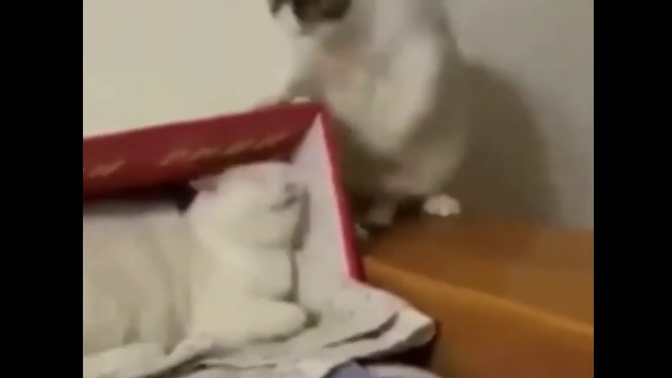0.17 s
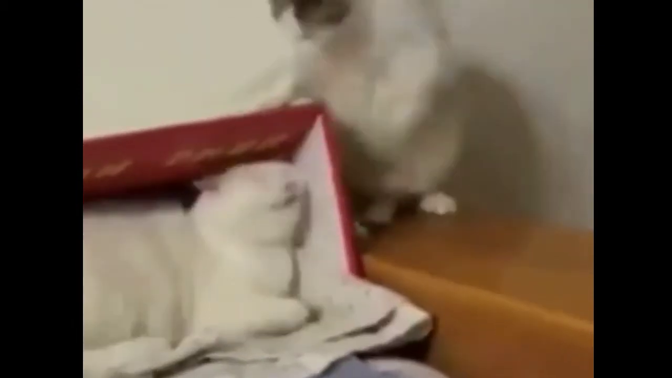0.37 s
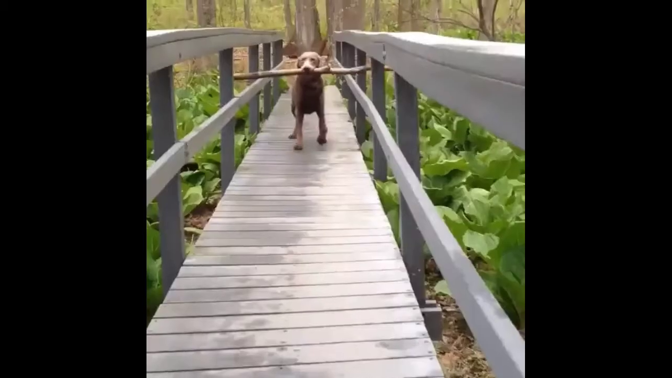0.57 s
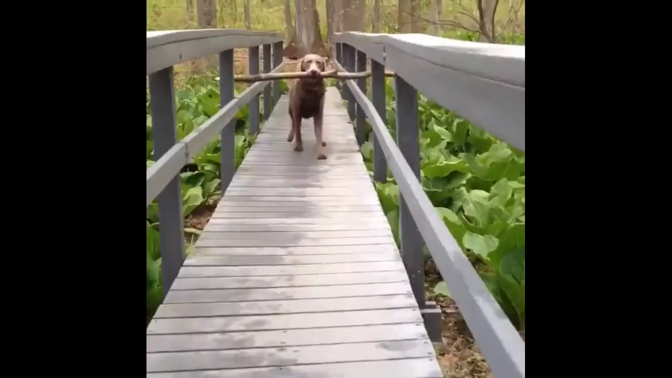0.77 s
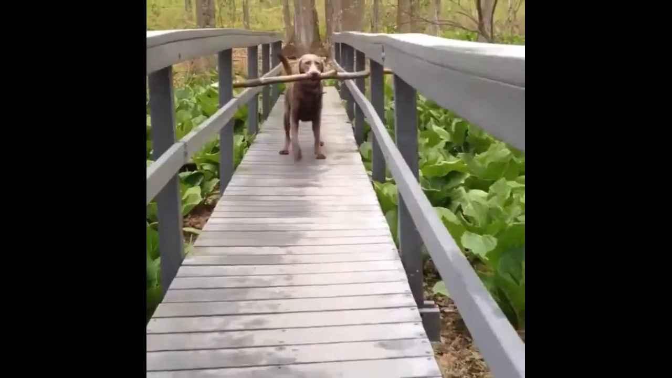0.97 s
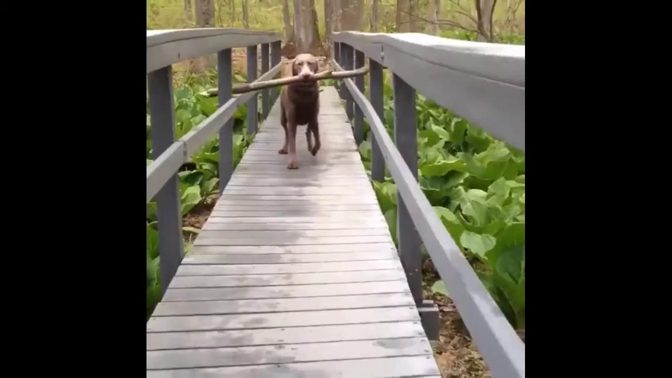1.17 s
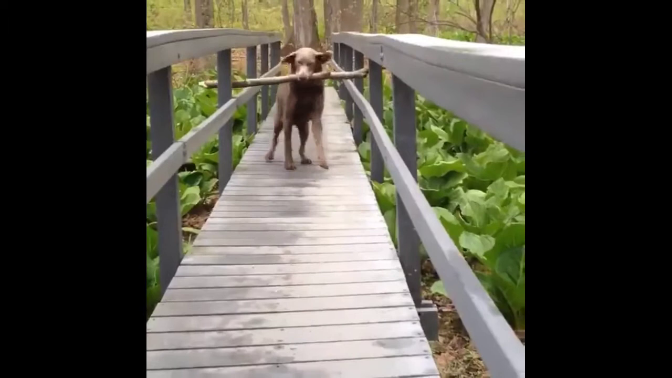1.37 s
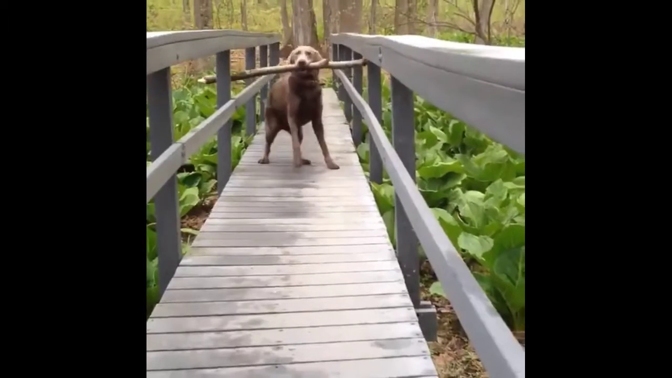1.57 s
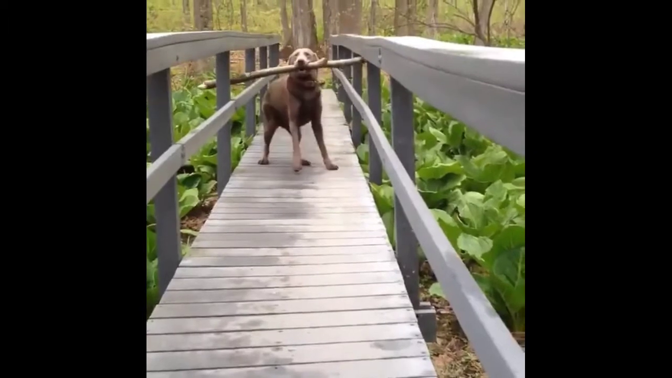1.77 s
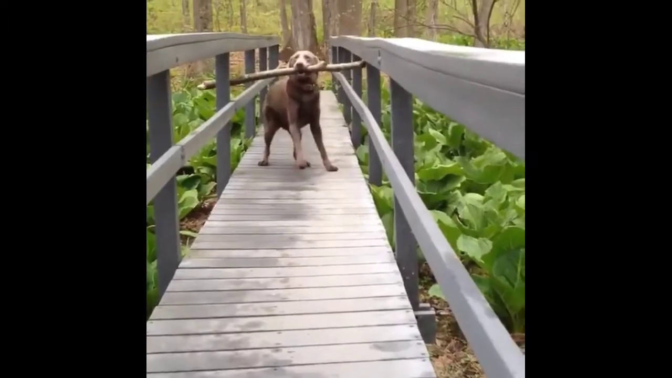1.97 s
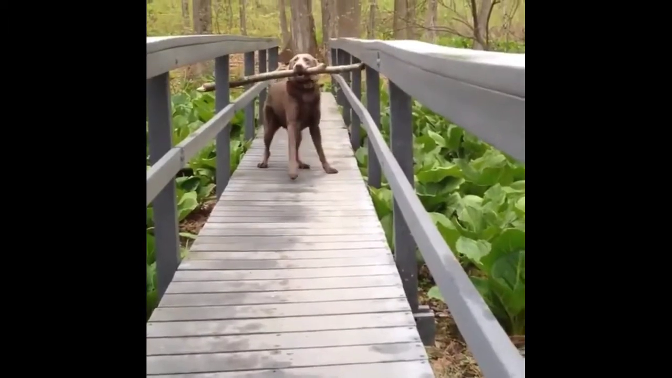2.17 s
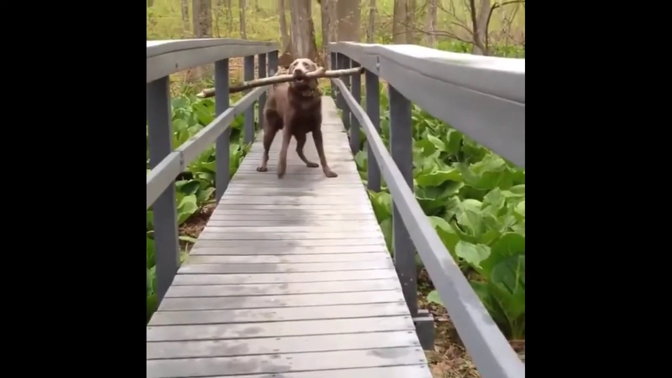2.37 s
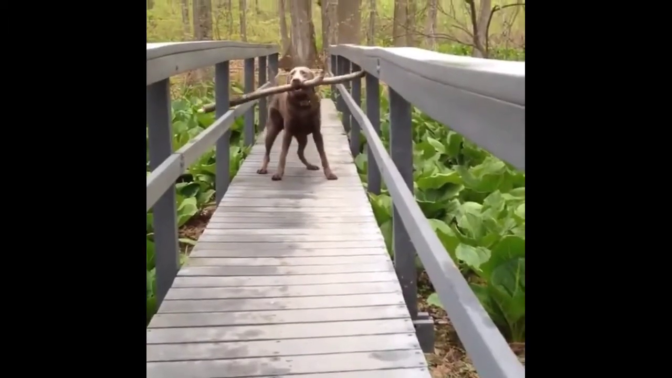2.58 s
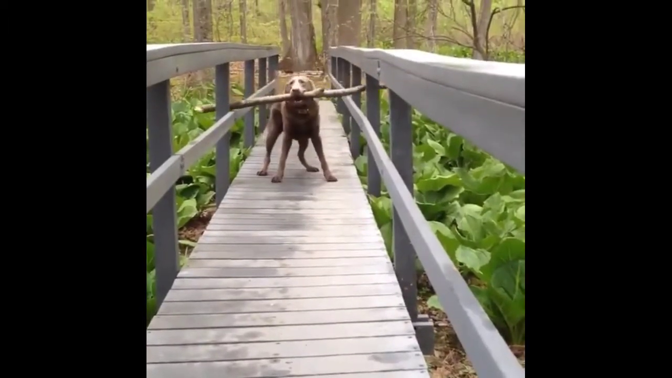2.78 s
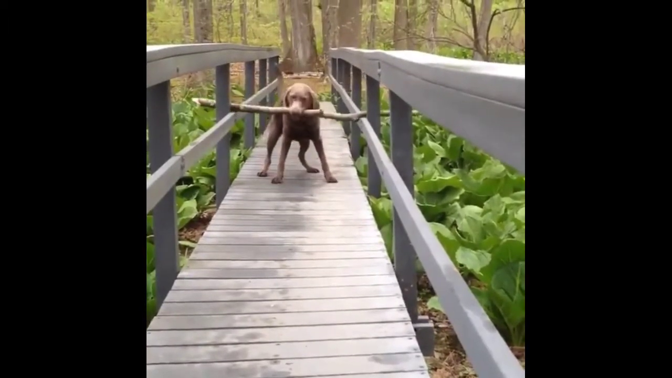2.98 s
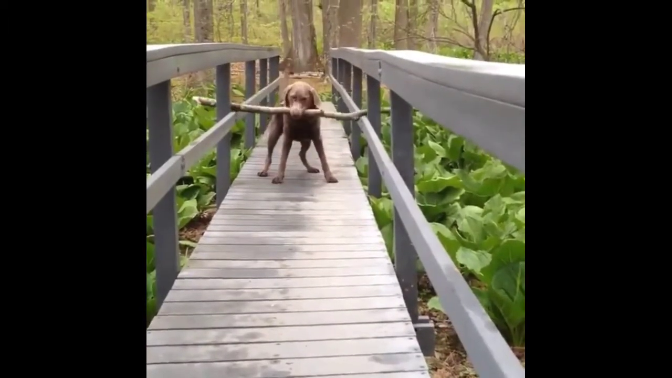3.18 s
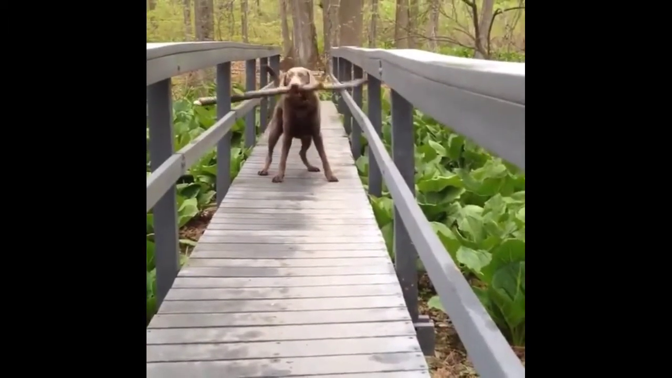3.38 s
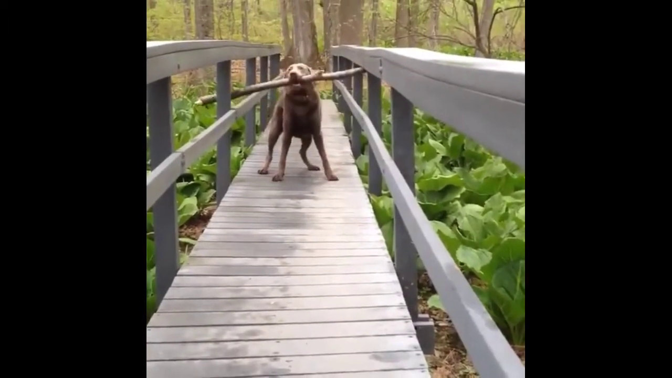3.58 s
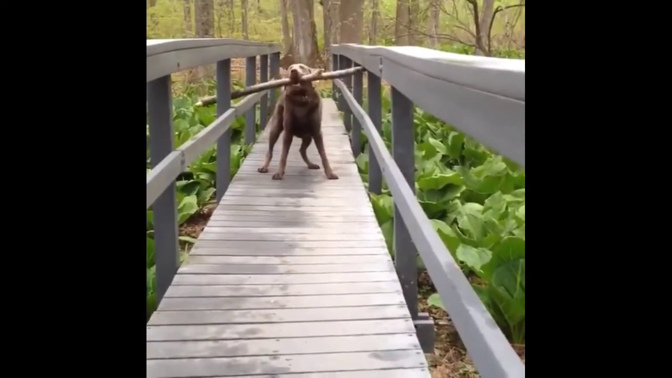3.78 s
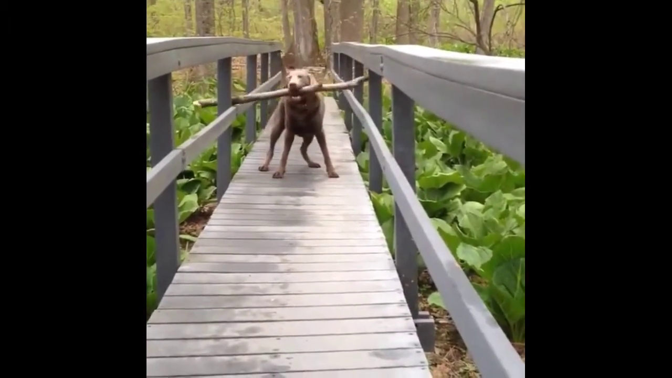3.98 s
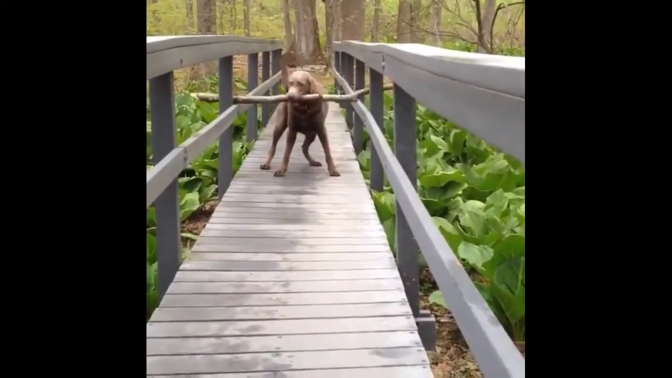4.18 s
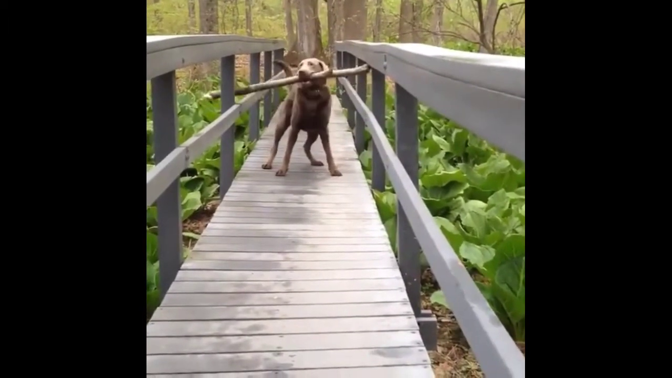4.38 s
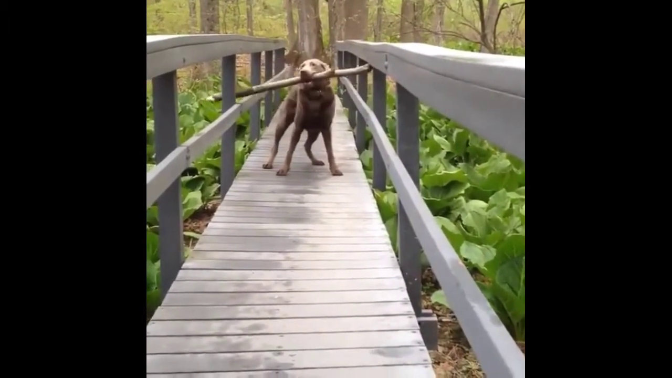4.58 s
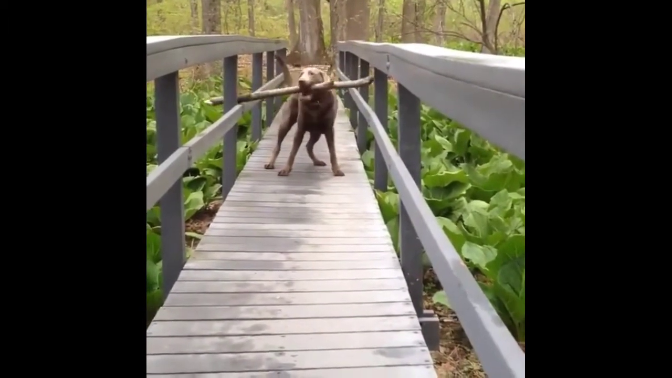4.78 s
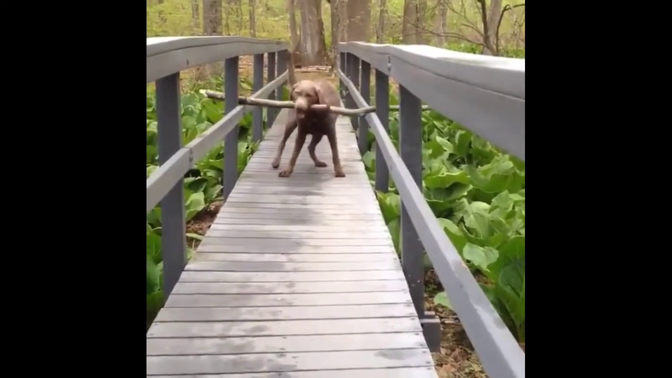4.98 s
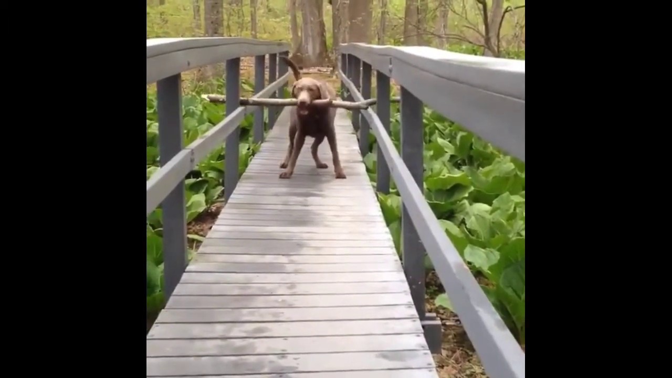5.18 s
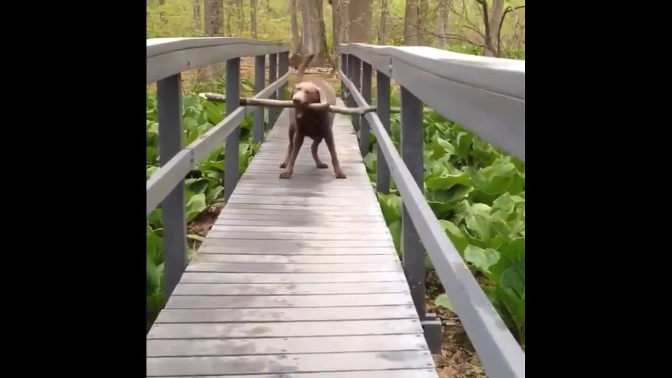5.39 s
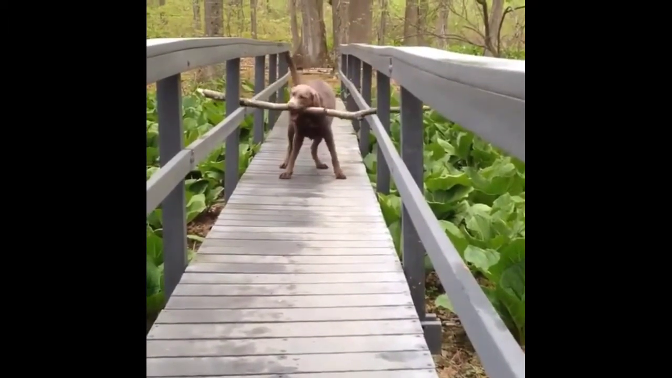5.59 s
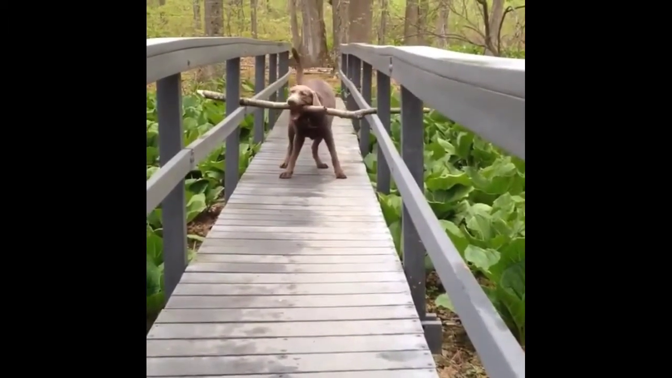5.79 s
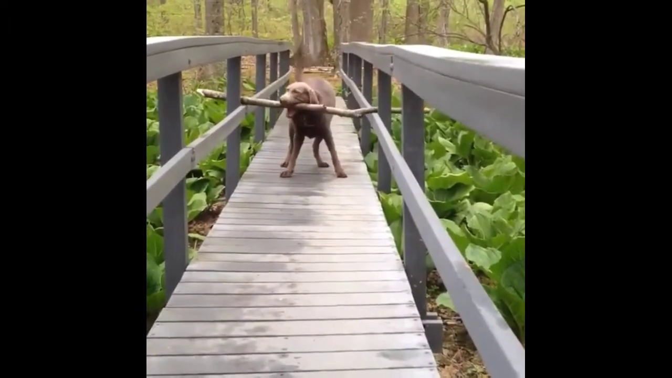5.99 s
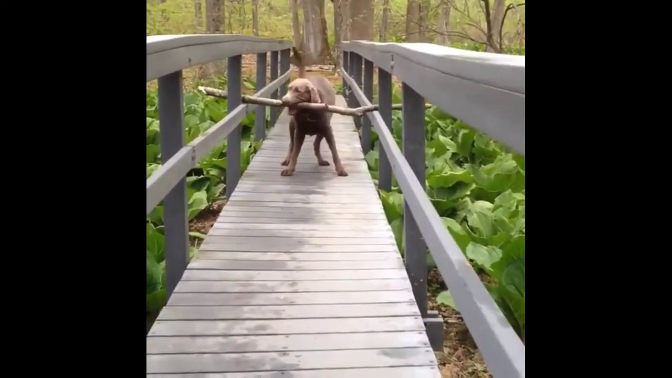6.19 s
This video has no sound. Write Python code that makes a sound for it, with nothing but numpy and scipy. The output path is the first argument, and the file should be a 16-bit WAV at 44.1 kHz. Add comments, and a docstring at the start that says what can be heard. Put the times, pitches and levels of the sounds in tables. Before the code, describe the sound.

After brief silence, a stick clatters loudly on wooden rails, then bumps and drags more softly while a dog whines twice and distant birds whistle.

```python
"""After a brief silence the hush of a wood opens as shaped noise, and far birds whistle as wavering sliding tones.
A dog comes along a wooden boardwalk: claws, twigs and small cracks of the stick tick as very short rings with
a spit of grit, the long stick it carries knocks on the railings as banks of decaying wood modes under a crack
of noise, and sliding paws scuff as bursts of grit. It whines twice, in thin tones with overtones and air, the
first with an airy hiss, and from then on the stick also drags, as rough grains ringing the wood. Trunks
scatter every sound but the hush."""
import sys
import numpy as np
from scipy import signal
from scipy.fft import rfft, irfft, next_fast_len
from scipy.io import wavfile
from scipy.ndimage import uniform_filter1d, map_coordinates

SR = 44100
rng = np.random.default_rng(int(sys.argv[2]) if len(sys.argv) > 2 else 0)


def dump_mix(stems):
    """Bounce the given channels to the path in sys.argv[1] as a 16-bit WAV at rate SR."""
    frames = np.atleast_2d(stems).T  # one column per channel
    limited = np.clip(frames, -1, 1)  # hard clip at full scale
    pcm = np.round(limited * 32767).astype(np.int16)
    wavfile.write(sys.argv[1], SR, pcm)


N = 274426
T = np.arange(N) / SR


def amp(db):
    """Turns dB into gain."""
    return 10 ** (np.asarray(db) / 20)


def unit(x):
    """Scales x to rms 1."""
    return x / np.sqrt(np.mean(x ** 2) + 1e-20)


def along(points, hz):
    """Reads (Hz, value) points along a log frequency axis."""
    point_hz, value = np.transpose(points)
    return np.interp(np.log(hz + 1), np.log(point_hz + 1), value)


def curves(rows):
    """Gives a gate with 5 ms edges, open during the rows, then a curve for each column after the time."""
    s, *columns = np.transpose(rows)
    gate = np.clip(np.minimum(T - s[0], s[-1] - T) / 0.005, 0, 1)
    return [gate] + [np.interp(T, s, column) for column in columns]


def wobble(rate):
    """Draws a smooth random curve with rate knots a second."""
    knots = rng.standard_normal(int(N * rate / SR) + 4)
    return map_coordinates(knots, [T * rate])


def filtered(x, response):
    """Multiplies the spectrum of x by a response of frequency."""
    size = next_fast_len(len(x) + 8192)
    hz = np.fft.rfftfreq(size, 1 / SR)
    return irfft(rfft(x, size) * response(hz), size)[:len(x)]


def noise(spectrum, size):
    """Colours white noise by a spectrum in dB and sets it to rms 1."""
    return unit(filtered(rng.standard_normal(size), lambda hz: amp(along(spectrum, hz))))


def add(track, s, sound):
    """Mixes a sound into the track at a time in seconds."""
    part = track[round(s * SR):][:len(sound)]
    part += sound[:len(part)]


# Colour of the hush: freq_hz [Hz], density_db [dB per Hz]
HUSH_SPECTRUM = [(20, -17), (79, -9), (197, -3), (371, -6), (426, -8), (463, -7), (593, -9), (1560, -17.5),
                 (3460, -22), (4560, -25.5), (13000, -33), (14500, -26)]
HUSH_DB = -58.5  # rms level around which the hush drifts


def hush():
    """The wood's steady noise: faint patches in time and frequency, and a slow drift in level."""
    cells = signal.stft(noise(HUSH_SPECTRUM, size=N), nperseg=512)[2]
    patches = uniform_filter1d(rng.standard_normal(cells.shape), 6, 0)
    patches = unit(uniform_filter1d(patches, 12, 1))
    bed = unit(signal.istft(cells * amp(1.5 * patches), nperseg=512)[1][:N])
    return amp(HUSH_DB + 0.81 * wobble(1.69)) * bed


# Far whistles: start_s [s], length_s [s], start_hz [Hz], slide_hz [Hz], level_db [dB]
BIRD_NOTES = [(0.627, 0.099, 4040, 200, -70), (0.993, 0.16, 3800, -110, -73), (1.686, .2, 3220, 1, -73.5),
              (1.705, 0.23, 3010, 120, -71.5), (1.757, 0.068, 4270, -76, -70),
              (1.875, 0.068, 3650, 17, -66), (1.914, 0.12, 4100, -35, -64.5), (2.034, 0.11, 2560, 0, -72),
              (1.973, 0.93, 6660, 359, -74), (3.477, 0.33, 3290, 5, -73), (3.854, 0.27, 3330, -28, -68),
              (4.255, 0.067, 2560, 40, -55), (4.405, 0.2, 3265, 124, -70), (4.482, .17, 2800, -17, -66),
              (4.602, 0.19, 4660, -200, -64.5), (5.044, 0.27, 3586, -110, -64.5),
              (5.344, 0.27, 3400, 62, -63.5), (5.585, .11, 3720, -32, -67), (5.642, 0.087, 3020, 85, -60),
              (5.669, 0.34, 3480, 98.5, -66.5), (6.012, 0.2, 3340, 115, -64.5),
              (6.185, 0.07, 5320, 91, -63)]
WAVER = 0.03  # share of its pitch by which a note wavers, per second of its length


def birds():
    """Sliding notes, blurred in pitch and level by the way through the leaves."""
    out = np.zeros(N)
    blur, flutter = wobble(110), amp(2.2 * wobble(40))
    for start, length, start_hz, slide_hz, level_db in BIRD_NOTES:
        end = start + length
        # each note reads the shared curves at an offset set by its pitch
        waver = 1 + WAVER * length * np.roll(blur, round(start_hz))
        hz = np.interp(T, [start, end], [start_hz, start_hz + slide_hz]) * waver
        shape = np.clip(np.minimum(T - start, end - T) / 0.029, 0, 1)
        level = amp(level_db) * shape * np.roll(flutter, 7 * round(start_hz))
        out += level * np.sin(2 * np.pi * np.cumsum(hz) / SR)
    return out


# Decay of the sound among the trunks: freq_hz [Hz], t60_s [s]
TREE_DECAY = [(200, 0.59), (1000, 0.92), (4000, 0.93), (12000, 0.77)]


def trees(x):
    """Trunks scatter the sound back about 20 ms later; each frequency dies at its own speed."""
    hz, t, cells = signal.stft(rng.standard_normal(SR), SR, nperseg=256)
    decay = amp(-60 * t / along(TREE_DECAY, hz)[:, None])
    tail = signal.istft(cells * decay, SR, nperseg=256)[1]
    return signal.fftconvolve(np.pad(x, (900, 0)), tail / np.linalg.norm(tail))[:N]


# Grit and hiss of the small sounds: freq_hz [Hz], density_db [dB per Hz]
GRIT_SPECTRUM = [(1180, -10), (2000, -5.5), (2600, -6.5), (4330, -3.5), (12500, -7), (14000, -8)]
# Modes of a small contact ringing together: pitch_multiple [ratio], level_db [dB]
TICK_RING = [(.84, -9), (1, 0), (1.2, -8), (1.45, -13)]
# Claws, twigs and small cracks of the stick: time_s [s], level_db [dB before a 3 dB trim], pitch_hz [Hz],
# hiss_db [dB re level_db], ring_t60_s [s]
SMALL_TICKS = [(0.688, -45, 2630, -2.5, 0.031), (0.9, -52.5, 2610, -4, 0.028),
               (1.372, -45, 2670, -7, 0.049), (1.5507, -28, 2770, -14, 0.029),
               (1.594, -39, 2580, -11, 0.029), (3.006, -56, 1520, -15, .03), (3.126, -46, 1200, -12, 0.048),
               (3.398, -45, 1690, -13, 0.044), (3.139, -56, 7760, 4, .04),
               (3.7913, -42.5, 2830, -10.5, 0.019), (4.017, -43.5, 5040, 2.5, 0.023),
               (4.064, -40.5, 6460, 4, 0.026), (4.2572, -37, 2230, -4, 0.031),
               (4.931, -45, 1700, -20, .025), (4.77, -40, 2700, -11.5, 0.019),
               (5.454, -34.5, 1810, -21, 0.012), (5.6198, -34, 2220, -29, 0.012)]
HISS_T60_S = 0.047


def ticks():
    """Claws, twigs and small cracks of the stick: a very short ring of a few modes with a spit of grit."""
    out, t = np.zeros(N), np.arange(SR // 10) / SR
    for s, level_db, pitch_hz, hiss_db, t60 in SMALL_TICKS:
        modes = sum(amp(db) * np.sin(2 * np.pi * multiple * pitch_hz * t) for multiple, db in TICK_RING)
        tone = amp(-60 * t / t60) * modes
        spit = amp(hiss_db - 60 * t / HISS_T60_S) * noise(GRIT_SPECTRUM, size=len(t))
        attack = 1 - np.exp(-t / 0.0005)
        add(out, s - 0.001, amp(level_db - 3) * attack * (tone + spit))
    return out


# Modes of rails and deck before random detuning: freq_hz [Hz], level_db [dB], t60_s [s]
WOOD_MODES = [(140.4, -2.5, 0.28), (170.6, -1.5, 0.38), (204.3, 1, 0.3), (240.7, 5, 0.22),
              (286.2, 1.5, 0.22), (329.6, 0, 0.21), (409, -9.5, 0.17), (447, -1.5, 0.14),
              (501.3, -3.5, 0.16), (570.4, -9.5, 0.16), (625, -1.5, 0.19), (707, -10.5, 0.24),
              (787, -7.5, 0.21), (906, -6.5, 0.15), (994, -0.5, 0.095), (1128, -0.5, 0.069),
              (1244, -2, 0.075), (1353, -11, 0.034), (1525, -1, 0.088)]
SPOT_DB, SPOT_OCTAVES = 8, 0.42  # lift of the modes near the favoured pitch, and its width
RATTLE, RATTLE_S = 2.2, 0.011  # phase shake (radians per kHz, scaled by hardness) and its pace


def ring(hardness, spot_hz, scatter_db, rise_s):
    """The wood's answer to one contact: a soft one drives the low modes, a hard one leans to the high ones."""
    t = np.arange(SR // 4) / SR
    hz, db, t60 = np.tile(np.transpose(WOOD_MODES), 2)[:, :, None]  # neighbouring boards ring in close pairs
    level_luck, pitch_luck, phase_luck = rng.standard_normal((3, len(hz), 1))

    corner_hz = 290 * 2 ** (2.3 * hardness)
    lean_db = 11 * hardness * np.log2(hz / corner_hz)
    lean_db = lean_db - 10 * np.log10(1 + (hz / corner_hz) ** 7)
    spot_db = SPOT_DB * np.exp(-(np.log2(hz / spot_hz) / SPOT_OCTAVES) ** 2)
    gain = amp(db + lean_db + spot_db + scatter_db * level_luck)

    # loose boards shake the phase of each mode
    bumps = np.exp(-(t / RATTLE_S - np.arange(t[-1] / RATTLE_S)[:, None]) ** 2)
    shake = rng.standard_normal((len(hz), len(bumps))) @ bumps
    drift = RATTLE * hardness * (hz + 150) / 1000 * shake
    cycles = hz * (1 + 0.023 * pitch_luck) * t + phase_luck
    modes = amp(-60 * t / t60) * np.sin(2 * np.pi * cycles + drift)

    # the swell is slower in the higher modes
    rise = 1 - np.exp(-(t / (rise_s * (hz / 300) ** 0.35)) ** 2)
    return np.sum(rise * gain * modes, axis=0) / np.linalg.norm(gain)


# Crack of bark: freq_hz [Hz], density_db [dB per Hz]
CRACK_SPECTRUM = [(530, -23), (900, -3.5), (1730, -8.5), (2420, -15), (2680, -19), (14000, -36.5)]
# Blows on the rails: time_s [s], level_db [dB], crack_db [dB re level_db], hardness [0-1],
# spot_hz [Hz, pitch favoured by the struck spot], rebound_gap_s [s], rebound_loss_db [dB]
STICK_KNOCKS = [(1.142, -17.5, -23.5, 0.69, 466, 0.011, 4), (1.27, -12, -19.5, 0.75, 470, 0.061, 10.5),
                (1.278, -7.5, -18.5, 0.59, 437, 0.016, 6.5), (1.778, -29, -60, 0.37, 306, 0.056, 11.5),
                (1.99, -23.5, -55, 0.49, 310, .041, 8.5), (2.11, -42, -43, 0.05, 260, 0.027, 10),
                (2.69, -32, -49, 0.31, 296, 0.035, 4.5), (2.993, -25, -25.5, 0.5, 314, .019, 5),
                (3.066, -41, -54, 0, 220, 0.028, 9), (3.122, -48, -16, 0.74, 240, 0.0091, 20),
                (3.384, -33.5, -36, 0.49, 350, 0.031, 3), (3.539, -30, -20.5, 0.42, 440, .03, 4.5),
                (3.92, -28.5, -31, 0.27, 294, 0.035, 2.3), (4.385, -19.5, -16, 0.71, 533, 0.025, 3.5),
                (4.734, -29, -26, 0.42, 280, 0.034, 3), (5.045, -23.5, -24.5, 0.56, 330, .016, 5),
                (5.517, -20, -23, 0.64, 565, 0.027, 5)]
REBOUNDS = 2
SOFTER, SINK = 0.54, 0.8  # shares of hardness and of favoured pitch kept at each rebound
CRACK_LOSS_DB = 9.5  # further loss of the crack at each rebound


def knocks():
    """Each blow rings the wood with a crack of bark on top, then the stick rebounds softer and duller."""
    out, t = np.zeros(N), np.arange(SR // 6) / SR
    bite = 1 - np.exp(-(t / 0.005) ** 2)
    snap = bite * (amp(-60 * t / 0.12) + 0.5 * amp(-60 * t / 0.25))
    for s, first_db, crack_db, hardness, spot_hz, gap_s, loss_db in STICK_KNOCKS:
        for k in range(REBOUNDS + 1):
            at, level_db = s + k * gap_s, first_db - k * loss_db
            body = ring(hardness * SOFTER ** k, spot_hz * SINK ** k, scatter_db=0.5, rise_s=0.0046)
            add(out, at - 0.007, amp(level_db) * body)
            crack = snap * noise(CRACK_SPECTRUM, size=len(t))
            add(out, at - 0.0015, amp(level_db + crack_db - k * CRACK_LOSS_DB) * crack)
    return out


# Soft bursts of grit and breath: sliding paws, and the airy hiss of the first whine:
# start_s [s], length_s [s], level_db [dB], fade_db [dB]
SOFT_BURSTS = [(1.552, 0.063, -47.5, 12), (2.262, 0.15, -61.5, 1.5), (2.61, 0.22, -64.5, 1),
               (2.867, 0.11, -63, -2), (5.515, 0.015, -51, 1.5)]
BURST_EDGE_S, BURST_EDGE_DB = 0.035, 14  # closing fall after the burst


def soft_bursts():
    """Sliding paws and the first whine's airy hiss: rough noise swells, changes level and falls away."""
    roughness = amp(1.1 * wobble(70) + 2.0 * wobble(19))
    grit = unit(noise(GRIT_SPECTRUM, size=N) * roughness)
    out = np.zeros(N)
    for s, length, level_db, fade_db in SOFT_BURSTS:
        end, end_db = s + length, level_db - fade_db
        gate, db = curves([(s - 0.008, level_db - 20), (s, level_db), (end, end_db),
                           (end + BURST_EDGE_S, end_db - BURST_EDGE_DB)])
        out += gate * amp(db) * grit
    return out


# Two whines, each a list of points: time_s [s], pitch_hz [Hz], level_db [dB], octave_db [dB]
WHINE_CALLS = [
    [(2.552, 2810, -64, -103), (2.564, 2890, -46, -70), (2.576, 2920, -34.5, -80), (2.626, 2808, -38, -52),
     (2.68, 2852, -38, -48.5), (2.794, 2943, -49, -68), (2.802, 2982, -57, -86), (2.89, 2928, -50, -104),
     (2.935, 2797, -67, -72)],
    [(4.066, 3130, -64, -69), (4.086, 3107, -46, -93), (4.11, 3090, -36, -88), (4.182, 3168, -48.5, -62.5),
     (4.298, 3243, -53.5, -57), (4.345, 3104, -48.5, -75), (4.384, 3060, -55, -72)],
]


def whine():
    """A thin, trembling nasal whistle with its octave, a blurred third partial and air rushing under it."""
    out = np.zeros(N)
    air = unit(filtered(rng.standard_normal(N), lambda hz: np.exp(-((hz - 2600) / 300) ** 2)))
    for call in WHINE_CALLS:
        gate, hz, db, octave_db = curves(call)
        phase = 2 * np.pi * np.cumsum(hz * (1 + 0.0035 * wobble(60))) / SR
        third = 0.11 * np.sin(3 * phase + 2 * wobble(200))
        tone = amp(db) * np.sin(phase) + amp(octave_db) * (np.sin(2 * phase) + third)
        tremble = np.sqrt(2) * amp(2.0 * wobble(29.4))  # the root makes the levels rms
        out += gate * (tremble * tone + amp(db - 23) * air)
    return out


# Stick dragging on the rail: start_s [s], strongest_s [s], end_s [s], level_db [dB],
# end_colour [0 dull - 1 bright]
STICK_DRAGS = [(2.754, 2.889, 3.16, -42, 0.33), (3.302, 3.392, 3.656, -43.5, 0.28),
               (3.994, 4.084, 4.2, -45, 0.13), (4.213, 4.315, 4.38, -43, 0.4),
               (4.768, 4.948, 5.15, -40, 0.32)]
DRAG_RISE_DB, DRAG_FALL_DB = 11, 7  # how far a stroke starts and ends below its strongest level


def drag():
    """Bark catches on the rail in uneven grains that keep the wood ringing."""
    grains = rng.standard_normal(N) * amp(3.5 * wobble(30))
    dull_wood = ring(0.2, spot_hz=330, scatter_db=1, rise_s=0.004)
    bright_wood = ring(0.75, spot_hz=600, scatter_db=1, rise_s=0.002)[:SR // 40]
    dull = unit(signal.fftconvolve(grains, dull_wood)[:N])
    dull = unit(filtered(dull, lambda hz: 1 + 1.05 * np.exp(-((hz - 332) / 25) ** 2)))  # the held stick hums
    bright = unit(signal.fftconvolve(grains, bright_wood)[:N])
    out = np.zeros(N)
    for start, top, end, top_db, colour in STICK_DRAGS:  # a stroke swells, fades and brightens as it goes
        gate, db, share = curves([(start, top_db - DRAG_RISE_DB, 0), (top, top_db, colour / 2),
                                  (end, top_db - DRAG_FALL_DB, colour)])
        share = np.clip(share, 0, 1)
        out += gate * amp(db) * (np.sqrt(1 - share) * dull + np.sqrt(share) * bright)
    return out


def scene():
    """The birds and the dog's sounds, each with their echo, over the hush."""
    far = birds()
    near = ticks() + knocks() + soft_bursts() + whine() + drag()
    echo = trees(amp(-16.0) * near + amp(-6) * far)
    return (near + far + echo + hush())[None]


START_S = 0.5635  # the sound begins here
TOP_HZ = 13900  # middle of the 600 Hz slope at the top of the band


def record(dry):
    """Silence before the start; the microphone drops the deep bass and the top of the band is cut off."""
    def band(hz):
        """Deep bass falls below 90 Hz and the treble slopes to nothing around the top."""
        treble = np.clip((TOP_HZ + 300 - hz) / 600, 0, 1) ** 2
        return treble / np.sqrt(1 + (90 / (hz + 1)) ** 4)
    opening = np.clip((T - START_S) / 0.012, 0, 1)
    return filtered(dry[0], band)[None] * opening


dry = scene()
out = record(dry)
dump_mix(out)
```